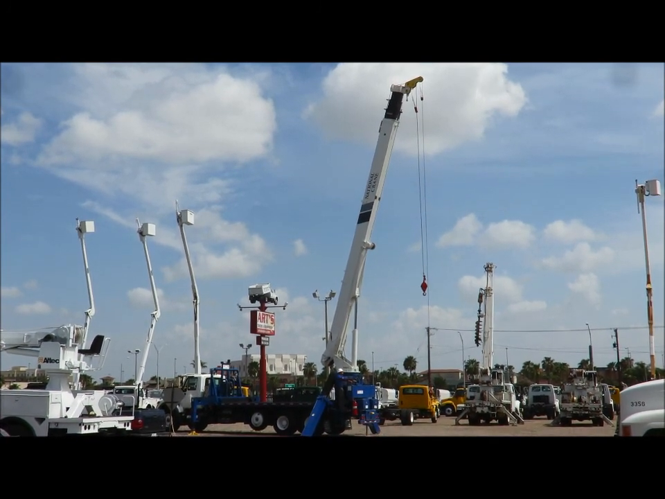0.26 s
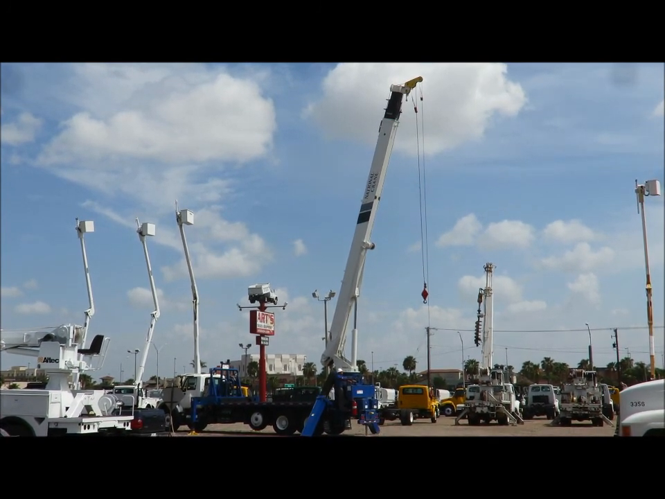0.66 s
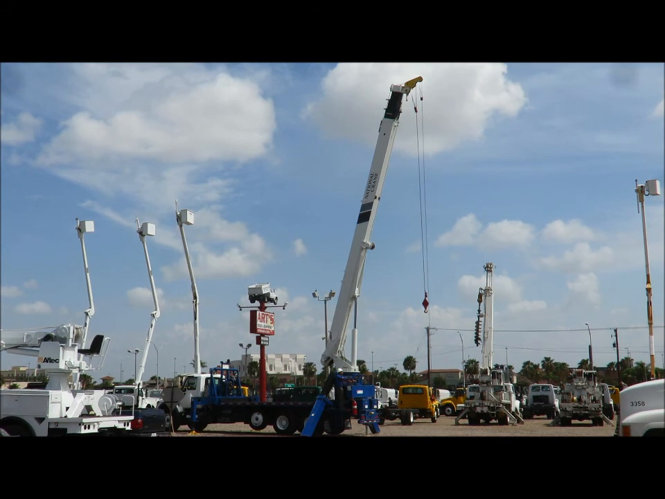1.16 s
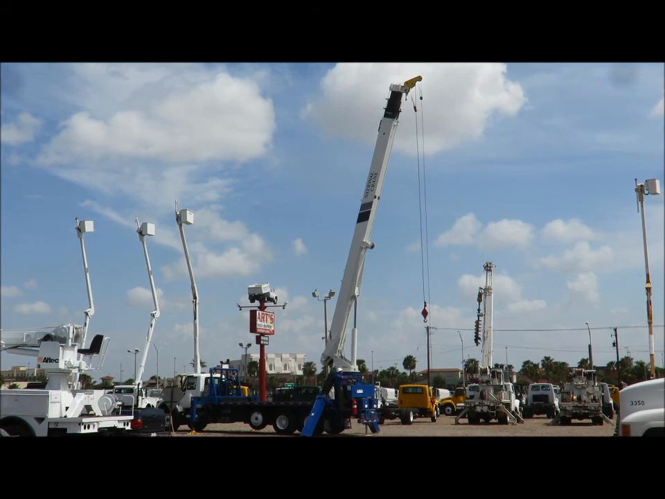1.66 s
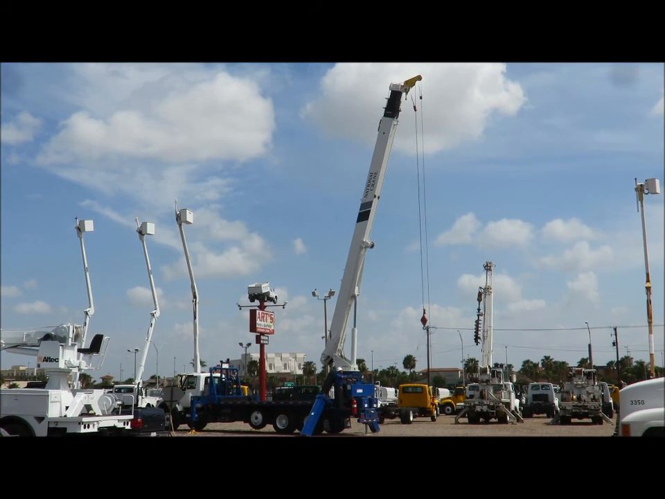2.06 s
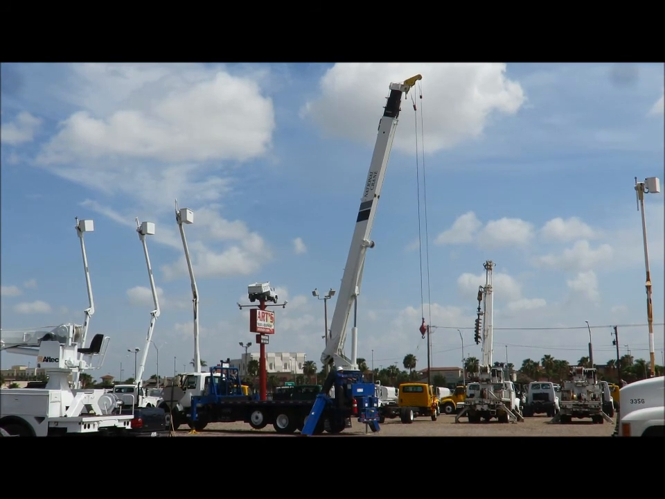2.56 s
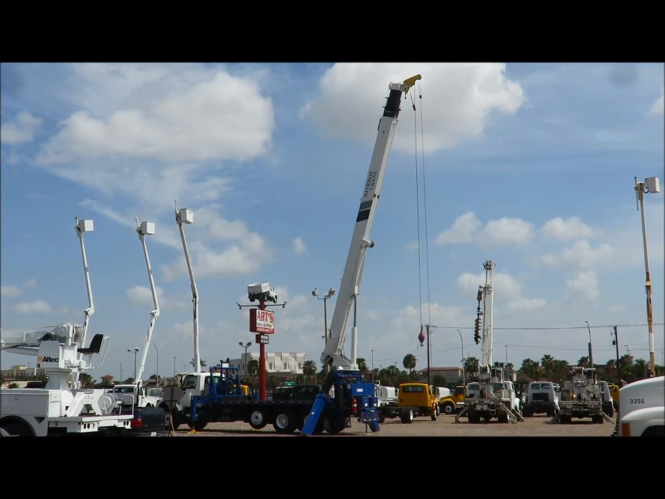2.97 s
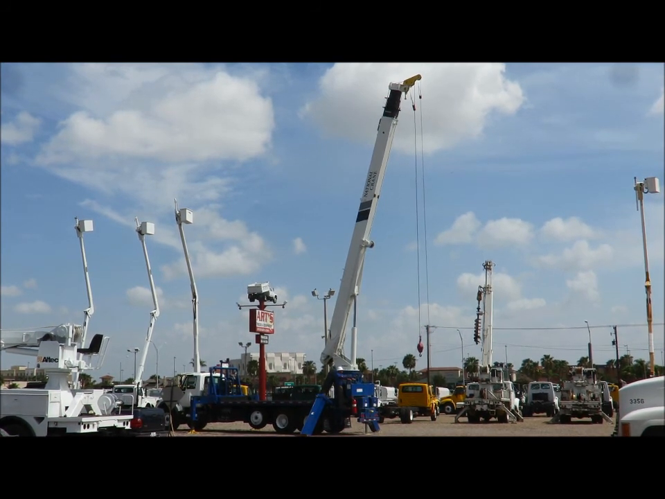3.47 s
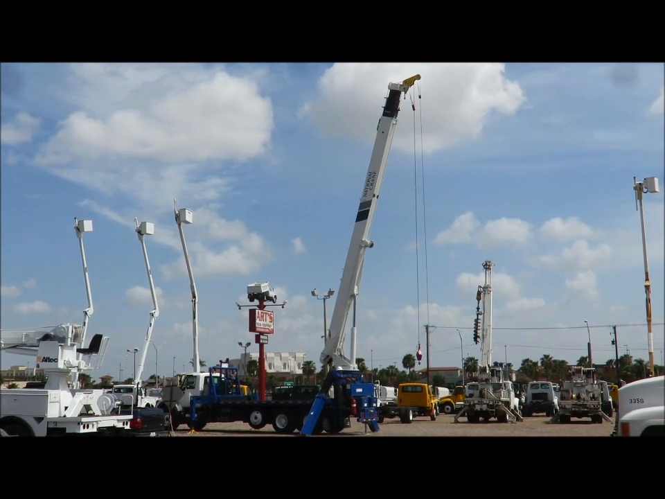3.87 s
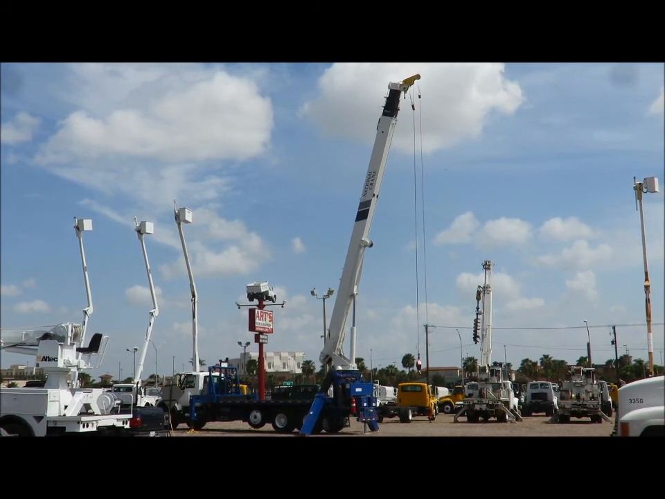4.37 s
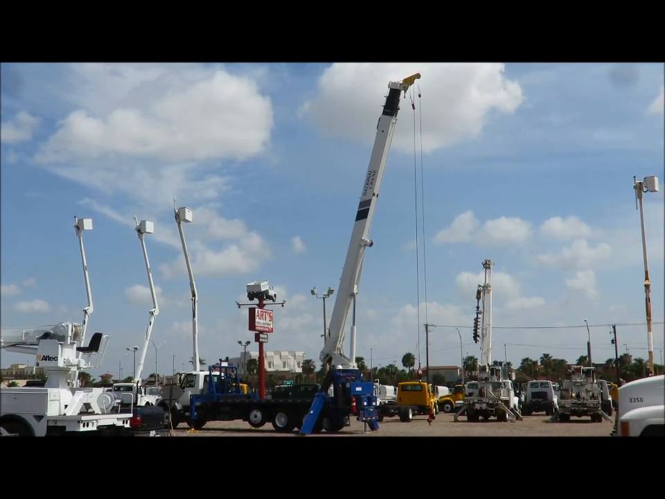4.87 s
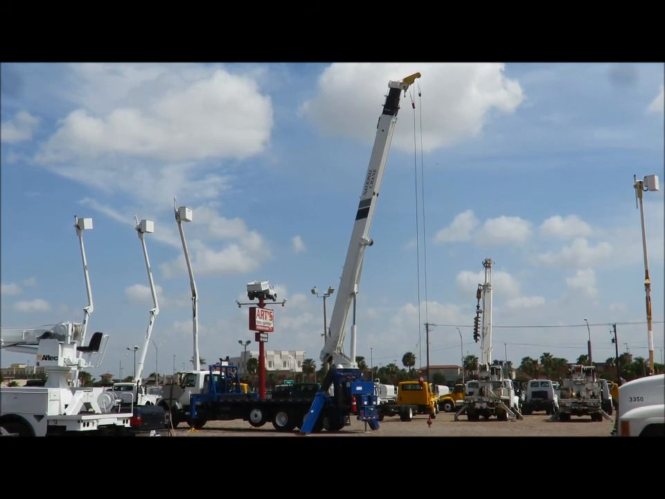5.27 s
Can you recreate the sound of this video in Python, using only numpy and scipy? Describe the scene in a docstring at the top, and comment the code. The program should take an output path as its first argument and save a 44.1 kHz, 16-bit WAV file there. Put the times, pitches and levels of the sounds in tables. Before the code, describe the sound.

Steady diesel drone and hydraulic pump whine from a crane lowering its hook across an open yard, with gusts thumping the microphone.

```python
"""An open yard, with a crane truck paying out its hook on the far side from a camera microphone.
A diesel at fast idle drives a whining hydraulic pump and a winch gear; oil rushes through the valves.
Other machines drone further off, and over the distance moving air makes the tones fade and return.
Close up, gusts buffet the microphone's two ports, and the microphone adds a thin, wide hiss."""
import sys
import numpy as np
from scipy.fft import rfft, irfft, next_fast_len
from scipy.io import wavfile
from scipy.ndimage import map_coordinates

SR = 44100
rng = np.random.default_rng(int(sys.argv[2]) if len(sys.argv) > 2 else 0)


def transcribe(u):
    """Save the signal u as a 16-bit wav file named by the first command-line argument.

    u: samples, shape (n,) or (channels, n), limited to [-1, 1]; the rate is SR.
    q: integer samples, one column per channel.
    """
    v = np.clip(np.atleast_2d(u).T, -1, 1)
    q = np.round(v * 32767).astype(np.int16)
    wavfile.write(sys.argv[1], SR, q)


N = 243255

# Pump piston rate as the governor hunts slightly: t/s, f/Hz
PISTON_RATE = [(0.0, 97.63), (0.64, 97.83), (0.88, 97.42), (1.06, 97.55), (1.36, 98.08), (1.66, 97.38),
               (1.85, 97.62), (2.2, 97.78), (2.32, 97.62), (2.88, 97.82), (3.64, 97.63), (3.76, 97.72),
               (4.08, 97.56), (4.32, 97.83), (4.84, 97.6), (5.28, 97.87), (5.51, 97.68)]
# The pump's two whines as the wind carries them over: t/s, main level/dB, upper level/dB
WHINE_LEVELS = [(0, -34.5, -38.5), (0.4, -31.5, -38.5), (0.65, -33, -38.5), (0.85, -30, -39),
                (1.15, -29.8, -38), (1.6, -30.3, -37), (1.8, -27.6, -38.5), (2.1, -29.3, -39.5),
                (2.6, -28.3, -40), (3.1, -30.3, -41), (3.65, -28.8, -39.5), (4.1, -31.3, -38),
                (4.7, -33, -36.8), (5.1, -33.3, -35), (5.52, -31.5, -35.5)]
# The upper whine arrives rough, then clears: t/s, scattered/direct ratio
UPPER_SCATTER = [(0, 0.7), (2, 0.9), (4.3, 0.6), (4.55, 0.32), (5.52, 0.32)]
# The pump's low hum: t/s, level/dB
HUM_LEVEL = [(0, -30.5), (1.2, -32.5), (2.6, -31.5), (3.4, -30.3), (4.4, -32), (5.52, -30.5)]
# Weaker pump tones: multiple of the piston rate, level/dB
WEAK_PUMP_TONES = [(6, -48), (14, -40), (20, -50), (22, -53), (23, -49.5), (26, -50), (28, -54), (30, -53),
                   (34, -56), (35, -53), (40, -55), (41, -50), (42, -53)]
# Fades as paths through the air cancel: t/s, half length/s, depth/dB for main, upper, hum, gear
PATH_FADES = [(0.2, 0.06, 7, 0, 3, 3), (0.59, 0.04, 6, 0, 2, 0), (0.72, 0.03, 13, 9, 6, 0),
              (0.86, 0.04, 0, 2, 0, 7), (1.35, 0.09, 9, 2, 4, 0), (1.9, 0.03, 3.5, 0, 0, 0),
              (2.04, 0.05, 1, 8, 0, 0), (2.2, 0.05, 3, 2, 0, 0), (2.58, 0.06, 0, 8, 0, 6),
              (2.88, 0.06, 7, 2, 0, 0), (3.25, 0.05, 1, 8, 0, 0), (3.56, 0.05, 0, 7, 0, 0),
              (3.83, 0.04, 3, 0, 0, 0), (4.27, 0.04, 12, 4, 1, 1), (4.385, 0.035, 14, 6, 0, 1),
              (5.28, 0.1, 9, 10, 0, 0)]
# The winch gear's mesh tone: t/s, level/dB
GEAR_LEVEL = [(0, -39), (1.3, -36.5), (2.3, -37), (3.1, -37.5), (5.52, -38)]
# Diesel tones: multiple of the firing rate, level/dB
DIESEL_TONES = [(7, -42), (8, -50), (13, -42), (14, -40.3), (15, -51), (19, -50), (20, -44.5), (21, -49),
                (22, -54), (24, -49.5), (27, -50.5), (28, -53)]
# How well the air carries the diesel's upper tones across the yard: t/s, gain/dB
AIR_CARRY = [(0, -1), (1.3, -2), (2, 2), (2.7, 5), (3.3, 4), (4.2, 2.5), (5.52, 2)]
# Deep drone from a machine further off: t/s, level/dB
BOOM_LEVEL = [(0, -50), (0.8, -58), (2.1, -57), (2.35, -42), (3.55, -45), (3.7, -34.5), (4.2, -38),
              (4.55, -32.5), (4.9, -42), (5.52, -39)]
# Fan and combustion noise: f/Hz, relative level/dB
ROAR_SPECTRUM = [(25, -38), (50, -31), (85, -0.5), (150, -0.5), (300, -1.5), (550, 2), (830, -2),
                 (1400, -3.5), (2000, -5), (2800, -15), (5000, -34), (9000, -60)]
# Oil hiss in the valves: f/Hz, relative level/dB
OIL_SPECTRUM = [(500, -43), (1500, -9.5), (2800, 2), (4000, 0.5), (5000, -1), (6500, -4), (9000, -7),
                (10000, -10), (10800, -19), (14000, -26.5), (15500, -47)]
# Oil hiss easing as the hook runs down: t/s, level/dB
OIL_LEVEL = [(0, -30), (1.4, -29.5), (3, -30.5), (3.7, -31), (4.9, -30), (5.52, -31.5)]
# Peaks and dips from the truck's panels and housings: f/Hz, width/Hz, lift/dB
PANEL_RESONANCES = [(512, 24, -3.5), (603, 260, 0.5), (1033, 320, 3.5), (1206, 34, -5), (1270, 65, 4),
                    (1380, 78, 4.5), (1522, 43, 6), (1680, 120, -2), (2020, 660, 3.5), (2110, 22, 2.5),
                    (2200, 36, 0), (2260, 22, -3), (2290, 130, 0.5), (2585, 110, 4), (2560, 40, -2),
                    (2950, 110, 1), (3380, 150, 1.5), (3910, 250, 1)]
# Machines further off in the yard: f/Hz, level/dB
DRONE_TONES = [(113, -50), (131.5, -46), (142, -48.5), (198, -50), (285, -49), (445, -42.5), (452, -50),
               (551, -45), (575, -49.5), (664, -46), (1242, -47), (1638, -48), (2083, -49.5)]
# Breeze at the microphone, freshening halfway through: t/s, strength/dB
BREEZE = [(0, -50), (0.7, -51), (1.6, -34.5), (1.9, -50), (2.3, -53), (2.7, -43), (3.05, -44),
          (3.25, -38.5), (4.2, -32.5), (4.5, -29), (5.1, -29), (5.52, -29.5)]
# Gusts at the microphone: crest t/s, hold/s, strength/dB
GUSTS = [(0.05, 0.4, -27.3), (1.3, 0.054, -36), (1.574, .07, -38), (2.84, .13, -31.5), (3.13, 0.19, -33),
         (3.39, .24, -32.5), (3.8, 0.033, -36), (4.59, 0.32, -28), (5.29, 0.04, -31), (5.48, .03, -32)]
# Large eddies on a port: f/Hz, relative level/dB
RUMBLE_SPECTRUM = [(25, -32), (45, -14), (65, -9), (90, -4.5), (130, 0), (180, -0.5), (260, -15),
                   (450, -16), (2000, -84)]
# Small, fast eddies on a port: f/Hz, relative level/dB
FLUTTER_SPECTRUM = [(60, -32), (130, -13), (210, 6), (310, 1), (460, -4), (800, -18.5), (2000, -14),
                    (6000, -75)]
# Single eddies that slap a port: t/s, level/dB, length/s, upper edge/Hz
SLAPS = [(0.119, -17, 0.0035, 820), (0.124, -16, 0.008, 340), (0.17, -17, 0.0055, 430),
         (0.215, -24.5, 0.012, 240), (0.28, -23.5, 0.016, 290), (0.335, -26, 0.009, 380),
         (0.425, -25, 0.012, 310), (1.0, -27, 0.011, 330), (1.58, -33, 0.016, 190), (1.71, -34, 0.016, 150),
         (2.89, -30, 0.015, 380), (2.94, -28, 0.011, 160), (2.985, -30, 0.011, 160),
         (3.132, -26.5, 0.008, 240), (3.293, -28, 0.007, 260), (3.32, -26, 0.007, 230),
         (3.42, -27.5, 0.011, 170), (3.462, -28.5, 0.008, 190), (3.62, -29, 0.012, 330),
         (3.82, -24, 0.008, 180), (4.527, -26, 0.008, 280), (4.558, -23, 0.008, 330),
         (4.605, -20.5, 0.011, 340), (4.631, -14, 0.006, 350), (4.639, -14.5, 0.0016, 750),
         (4.658, -22, 0.004, 450), (4.708, -19.5, 0.006, 370), (4.78, -20.5, 0.007, 320),
         (4.825, -25, 0.008, 260), (4.868, -21, 0.011, 300), (4.91, -26, 0.008, 280),
         (5.11, -27.5, 0.013, 260), (5.3, -26, 0.012, 400), (5.49, -27, 0.01, 280)]
# Stereo width of the buffeting at its widest: f/Hz, side against mid/dB
WIND_WIDTH = [(40, -29), (90, -28), (150, -16.5), (260, -7.5), (500, -4), (2000, -2)]
# The truck's small lead at the left port, as the camera widens it: f/Hz, side against mid/dB
TRUCK_WIDTH = [(500, -40), (1900, -32), (2600, -18), (4000, -12), (6000, -5.5), (9000, -4), (14000, -4)]
# The microphone's own hiss: f/Hz, relative level/dB
MIC_HISS_SPECTRUM = [(300, -68), (1200, -61), (1900, -7), (2500, 4), (6000, 4), (10000, 3.5), (13500, 2),
                     (14500, -3), (15600, -14)]

MAIN_ORDER, UPPER_ORDER, HUM_ORDER = 13, 21, 7  # multiples of the piston rate
FIRINGS_PER_PISTON, TEETH_PER_PISTON = 77.28 / 97.68, 2484 / 97.68
GUST_RISE_S, GUST_FALL_S, GUST_SAG_DB_PER_S = 0.035, 0.045, 6
FLUTTER_GROWTH, FLUTTER_FROM_DB = 1.22, -27  # flutter gains on the rumble as the wind rises


def hydraulic_pump(strokes):
    """Pressure ripple from the pistons: two whines, a low hum and a set of weaker tones."""
    main_db, upper_db = curves(WHINE_LEVELS)
    hum_db, = curves(HUM_LEVEL)
    upper_scatter, = curves(UPPER_SCATTER)
    main_fade_db, upper_fade_db, hum_fade_db, _ = path_fades()
    main = amp(main_db - main_fade_db) * tone(MAIN_ORDER * strokes, scatter=0.04, rate=8)
    upper = amp(upper_db - upper_fade_db) * tone(UPPER_ORDER * strokes, scatter=upper_scatter, rate=28)
    hum = amp(hum_db - hum_fade_db) * tone(HUM_ORDER * strokes, scatter=0.11, rate=12)
    weak = sum(amp(db) * tone(order * strokes, scatter=0.53, rate=6) for order, db in WEAK_PUMP_TONES)
    return main + upper + hum + weak


def winch_gear(strokes):
    """Meshing teeth sing a tone and its octave; the winch runs a little unevenly."""
    level_db, = curves(GEAR_LEVEL)
    *_, fade_db = path_fades()
    mesh_cycles = TEETH_PER_PISTON * strokes + 0.13 * wobble(7)
    mesh = amp(level_db - fade_db) * tone(mesh_cycles, scatter=0.3, rate=30)
    octave = amp(-52) * tone(2 * mesh_cycles, scatter=0.32, rate=5.4)
    return mesh + octave


def diesel(firings, carry_db):
    """Harmonics of the firing rate; moving air bends the higher orders more than the low ones."""
    return sum(amp(db + carry_db * min(order / 20, 1)) * tone(order * firings, scatter=0.4, rate=14)
               for order, db in DIESEL_TONES)


def deep_drone(hz=88):
    """A deep note from a machine further off, swelling in the second half."""
    level_db, = curves(BOOM_LEVEL)
    return amp(level_db) * tone(hz * np.arange(N) / SR, scatter=0.4, rate=20)


def engine_roar(firings, carry_db):
    """Fan and combustion noise, pulsing with the firings and coloured by the panels."""
    level_db = -28.5 + 0.079 * carry_db + 0.067 * wobble(14)
    pulse = 1 + 0.11 * np.cos(2 * np.pi * firings)
    return amp(level_db) * pulse * noise(ROAR_SPECTRUM, panel_lift)


def oil_rush(strokes):
    """Oil hisses through the valves, rippling with each piston."""
    level_db = curves(OIL_LEVEL)[0] + 0.44 * wobble(7)
    ripple = 1 + 0.024 * np.cos(2 * np.pi * strokes)
    return amp(level_db) * ripple * noise(OIL_SPECTRUM, panel_lift)


def panel_lift(hz):
    """The lift in dB that the truck's resonances give to its noise."""
    return sum(db / (1 + (2 * (hz - centre) / width) ** 2) for centre, width, db in PANEL_RESONANCES)


def distant_machines(carry_db):
    """Steady-pitched drones from further off, a little louder when the air carries well."""
    t = np.arange(N) / SR
    drone = sum(amp(db) * tone(hz * t, scatter=0.35, rate=15) for hz, db in DRONE_TONES)
    return amp(0.34 * carry_db) * drone


def wind_on_microphone():
    """Wind buffeting, centred in the bass and wider higher up; the image narrows when it is quiet."""
    strength_db = wind_strength()
    spread = amp(strength_db - strength_db.max())
    side = spread * filtered(buffeting(strength_db), lambda hz: amp(along(WIND_WIDTH, hz)))
    return buffeting(strength_db) + np.outer([1, -1], side)


def wind_strength():
    """The breeze plus its gusts, in dB: each gust rises, sags while it holds, and falls away."""
    t = np.arange(N) / SR
    power = amp(curves(BREEZE)[0]) ** 2
    for crest, hold, db in GUSTS:
        rise = np.exp(-np.maximum(crest - t, 0) / GUST_RISE_S)
        fall = np.exp(-np.maximum(t - crest - hold, 0) / GUST_FALL_S)
        sag_db = GUST_SAG_DB_PER_S * np.clip(t - crest, 0, hold)
        power += (rise * fall * amp(db - sag_db)) ** 2
    return 10 * np.log10(power)


def buffeting(strength_db):
    """Big eddies rumble on a port, small ones flutter more as the wind rises, single ones slap it."""
    flutter_db = FLUTTER_FROM_DB + FLUTTER_GROWTH * (strength_db - FLUTTER_FROM_DB)
    churn_db = -0.5 * wobble(24.05)
    rumble = amp(churn_db - 3.5) * eddy_gain(strength_db) * noise(RUMBLE_SPECTRUM)
    flutter = amp(churn_db - 3) * eddy_gain(flutter_db) * noise(FLUTTER_SPECTRUM)
    slaps = sum(amp(db) * slap(at, length, edge_hz) for at, db, length, edge_hz in SLAPS)
    return rumble + flutter + slaps


def eddy_gain(strength_db, still_air_db=-54.5):
    """Gain for a wind strength: weak air slides past the port almost without a sound."""
    return amp(strength_db) / (1 + amp(still_air_db - strength_db) ** 2)


def slap(at, length, edge_hz):
    """One eddy crossing the port: a brief burst of low noise, about rms 1 at its crest."""
    t = np.arange(-SR // 10, SR // 10) / SR
    swell = np.exp(-0.5 * (t / length) ** 2)
    hz = np.fft.rfftfreq(len(t), 1 / SR)
    # The microphone sheds deep bass; the eddy's size sets the upper edge.
    colour = hz ** 4 / (hz ** 4 + (edge_hz / 2.1) ** 4) / (1 + (hz / edge_hz) ** 4)
    burst = swell * irfft(rfft(rng.standard_normal(len(t))) * colour, len(t))
    burst *= np.sqrt(np.sum(swell ** 2) / np.sum(burst ** 2))
    return np.interp(np.arange(N) / SR, at + t, burst, left=0, right=0)


def microphone_hiss():
    """The microphone's own thin noise, in opposite phase left and right."""
    return np.outer([1, -1], amp(-32) * noise(MIC_HISS_SPECTRUM))


def path_fades():
    """Brief losses in dB as paths across the yard cancel: main whine, upper whine, hum, gear."""
    t = np.arange(N) / SR
    return sum(np.outer(depths, 1 / (1 + ((t - at) / half) ** 4)) for at, half, *depths in PATH_FADES)


def tone(cycles, scatter, rate):
    """A distant sine of rms 1: a direct path plus a share scattered by moving air and parked trucks."""
    paths = (1 + scatter * (wobble(rate) + 1j * wobble(rate))) / np.sqrt(1 + 2 * scatter ** 2)
    return unit(np.real(paths * np.exp(2j * np.pi * (cycles + rng.random()))))


def noise(spectrum, lift=lambda hz: 0):
    """Noise of rms 1 with the given spectrum and an optional lift in dB."""
    return unit(filtered(rng.standard_normal(N), lambda hz: amp(along(spectrum, hz) + lift(hz))))


def wobble(rate):
    """A smooth random curve, rate knots a second."""
    return map_coordinates(rng.standard_normal(1024), [np.arange(N) * rate / SR], mode="mirror")


def filtered(x, response):
    """x through a frequency response."""
    size = next_fast_len(N + 8192)
    return irfft(rfft(x, size) * response(np.fft.rfftfreq(size, 1 / SR)), size)[..., :N]


def curves(rows):
    """One value per sample for each column after the time."""
    times, *columns = np.transpose(rows)
    return [np.interp(np.arange(N) / SR, times, column) for column in columns]


def along(points, hz):
    """Points of f/Hz, value, read on a log frequency axis."""
    freqs, values = np.transpose(points)
    return np.interp(np.log(hz + 1), np.log(freqs + 1), values)


def amp(db):
    """Decibels to gain."""
    return 10 ** (np.asarray(db) / 20)


def unit(x):
    """Scale to rms 1."""
    return x / np.sqrt(np.mean(x ** 2) + 1e-20)


def scene():
    """The far machinery reaches the left port a moment early; wind and hiss spread to the sides."""
    strokes = np.cumsum(curves(PISTON_RATE)[0]) / SR
    firings = FIRINGS_PER_PISTON * strokes
    carry_db, = curves(AIR_CARRY)
    yard = hydraulic_pump(strokes) + winch_gear(strokes) + diesel(firings, carry_db)
    yard += distant_machines(carry_db)
    yard += deep_drone() + engine_roar(firings, carry_db) + oil_rush(strokes)
    # The camera widens the difference of its closely spaced ports, so the lead shows in the treble.
    lead = filtered(yard, lambda hz: 1j * amp(along(TRUCK_WIDTH, hz)))
    stereo_yard = yard * amp([[-0.15], [0.15]]) + np.outer([1, -1], lead)
    return stereo_yard + microphone_hiss() + wind_on_microphone()


def record(dry, top_hz=15600):
    """The camera keeps nothing above its band limit."""
    return filtered(dry, lambda hz: hz < top_hz)


dry = scene()
out = record(dry)
transcribe(out)
```